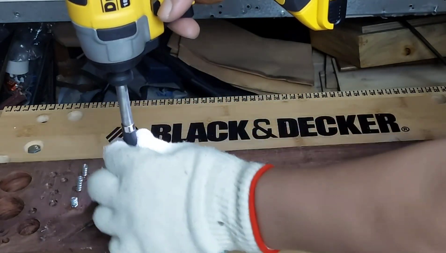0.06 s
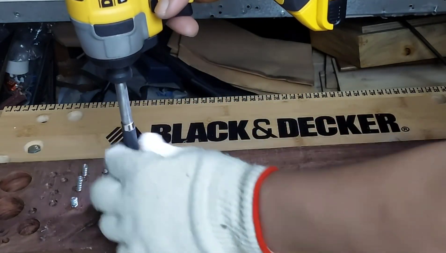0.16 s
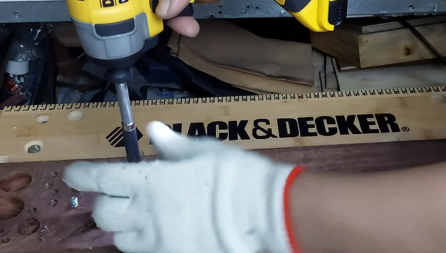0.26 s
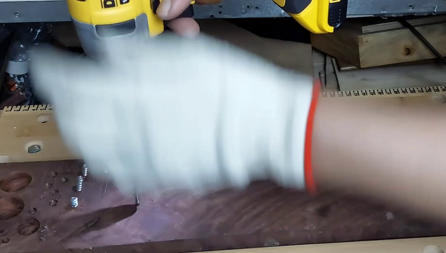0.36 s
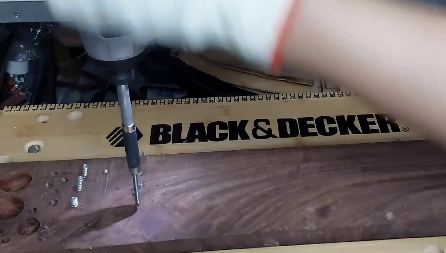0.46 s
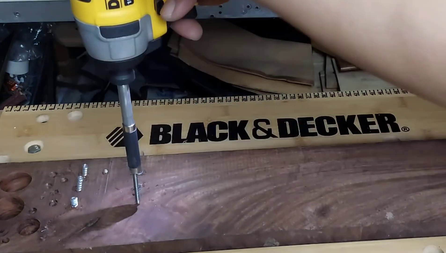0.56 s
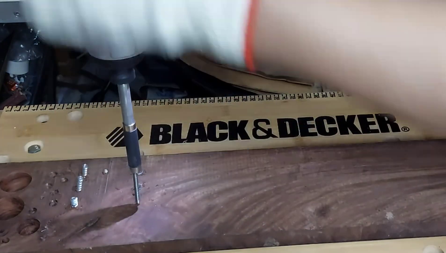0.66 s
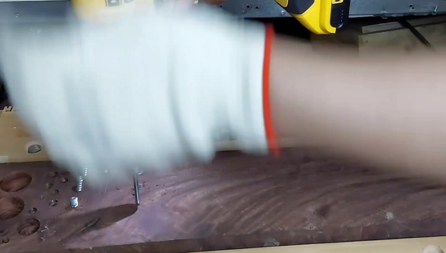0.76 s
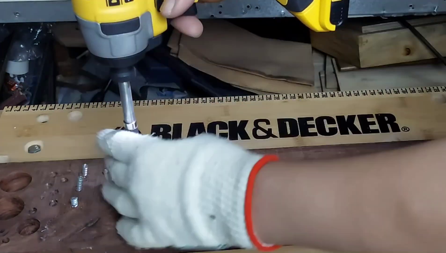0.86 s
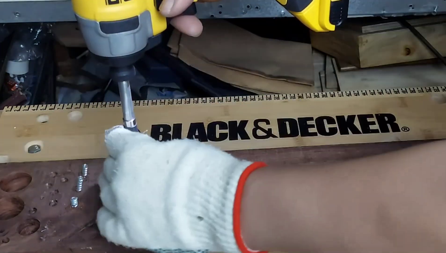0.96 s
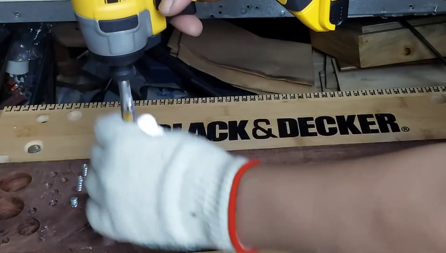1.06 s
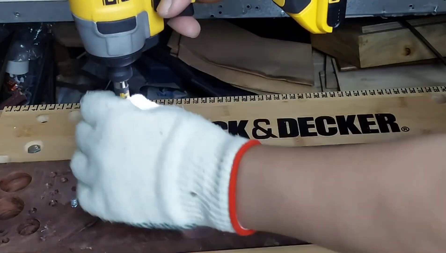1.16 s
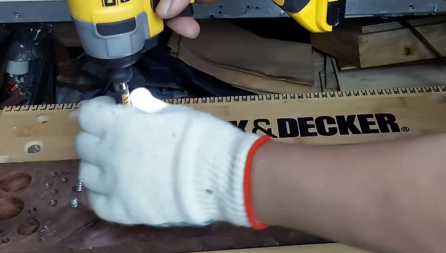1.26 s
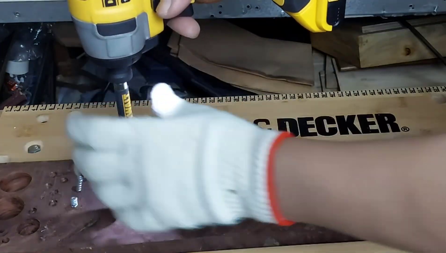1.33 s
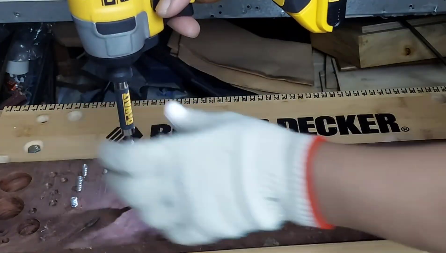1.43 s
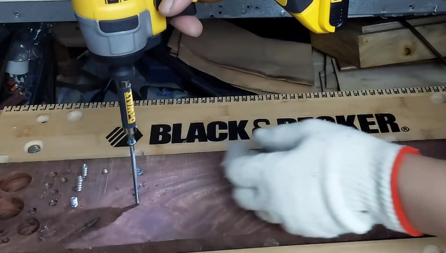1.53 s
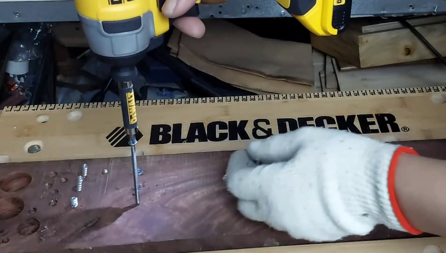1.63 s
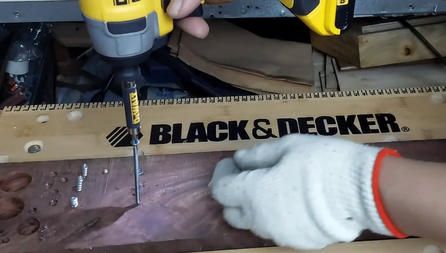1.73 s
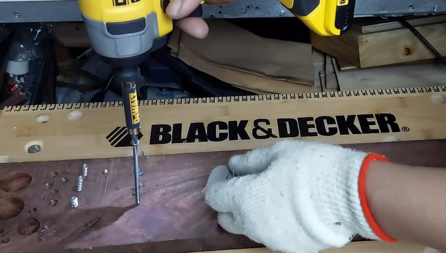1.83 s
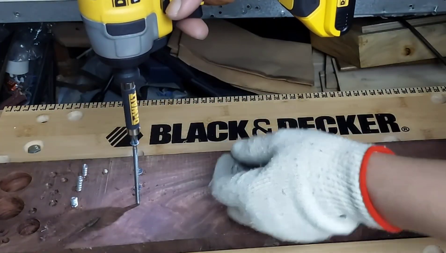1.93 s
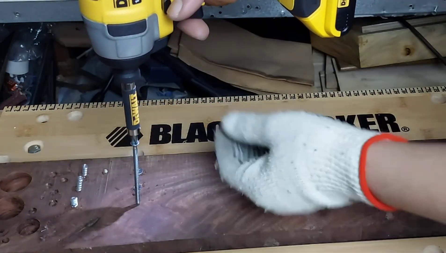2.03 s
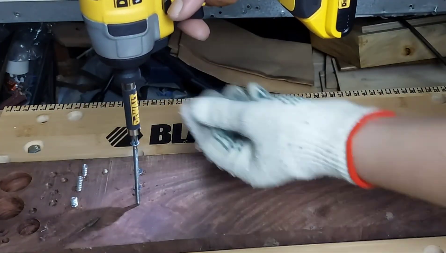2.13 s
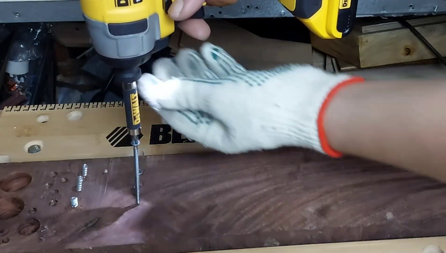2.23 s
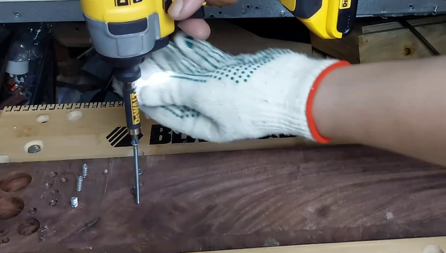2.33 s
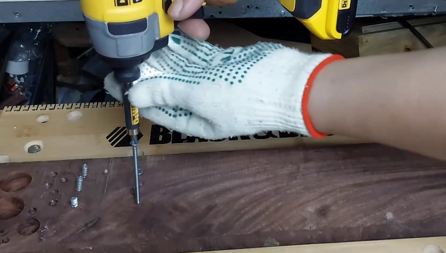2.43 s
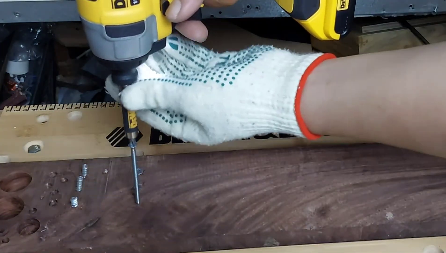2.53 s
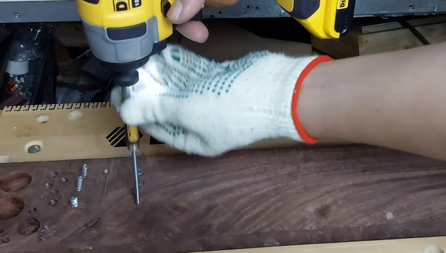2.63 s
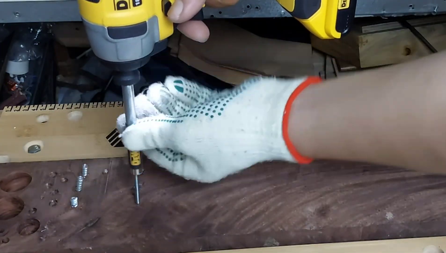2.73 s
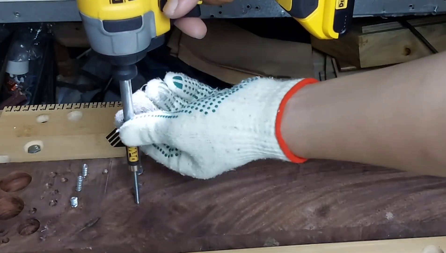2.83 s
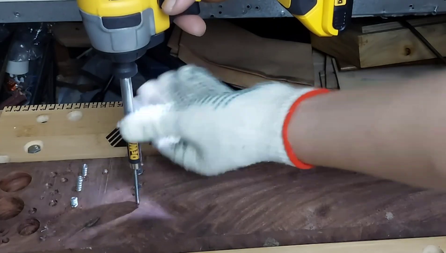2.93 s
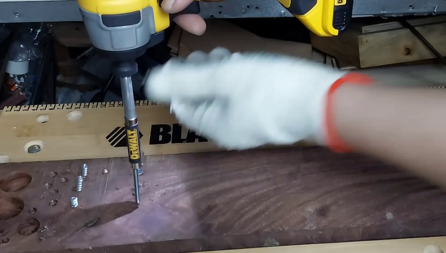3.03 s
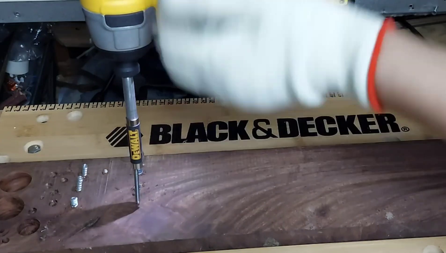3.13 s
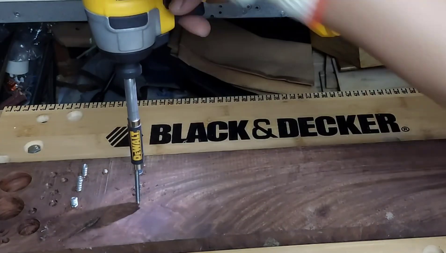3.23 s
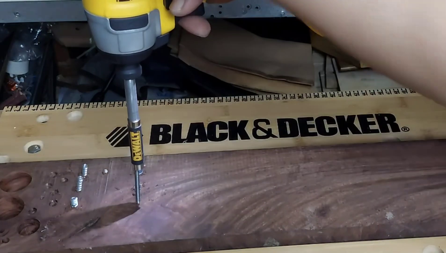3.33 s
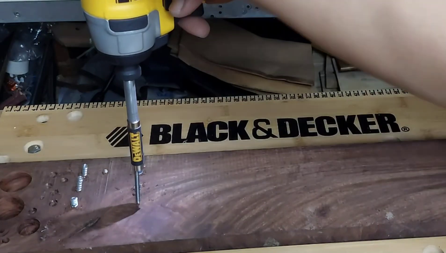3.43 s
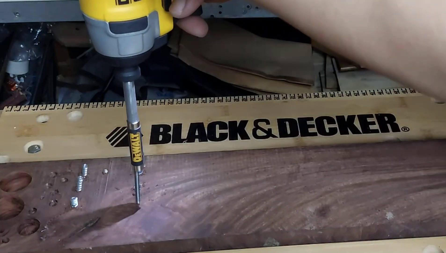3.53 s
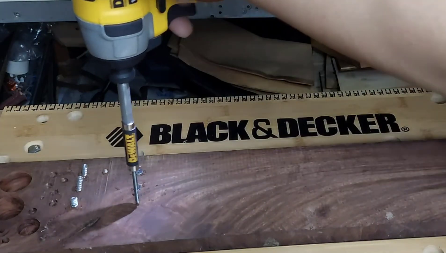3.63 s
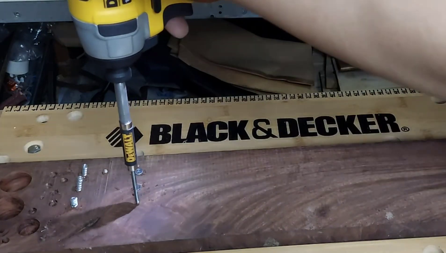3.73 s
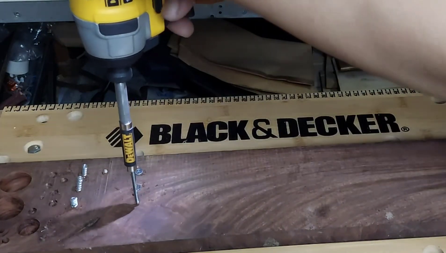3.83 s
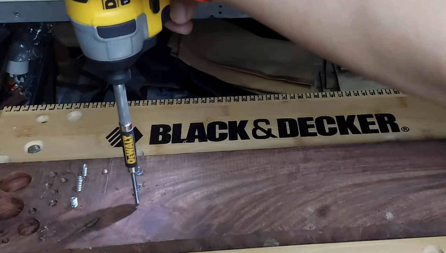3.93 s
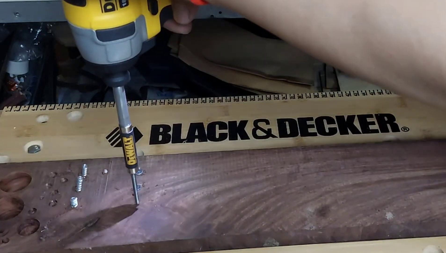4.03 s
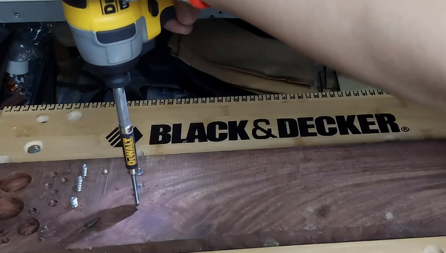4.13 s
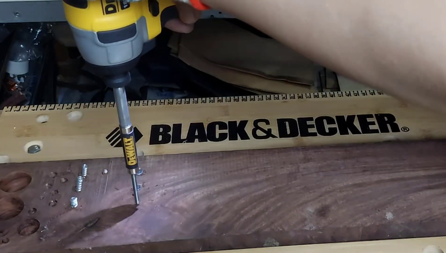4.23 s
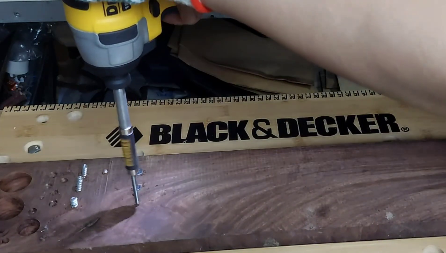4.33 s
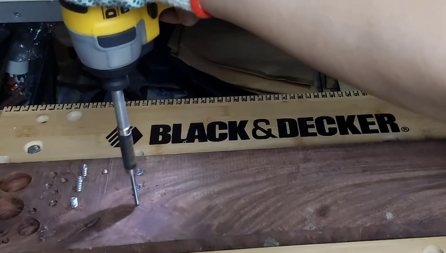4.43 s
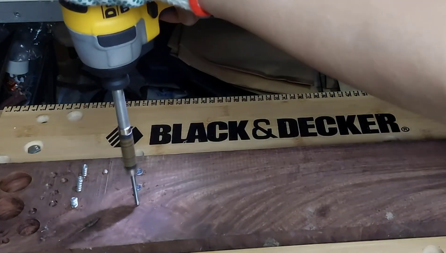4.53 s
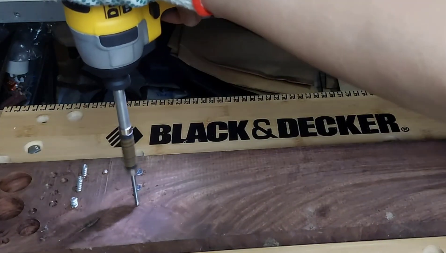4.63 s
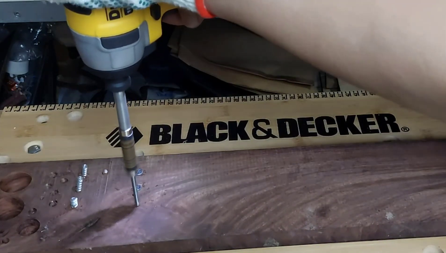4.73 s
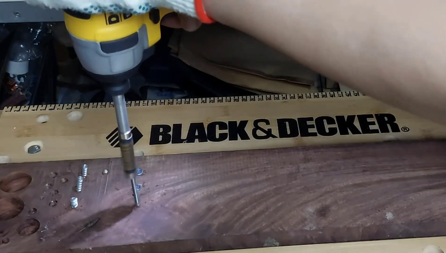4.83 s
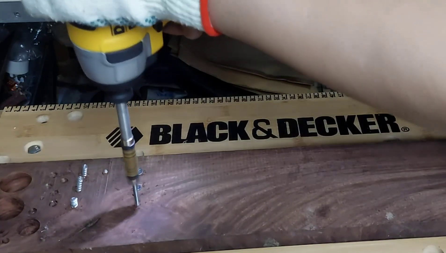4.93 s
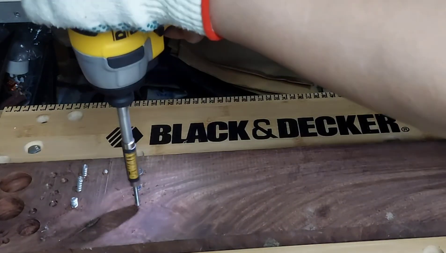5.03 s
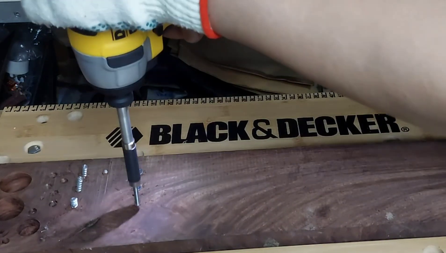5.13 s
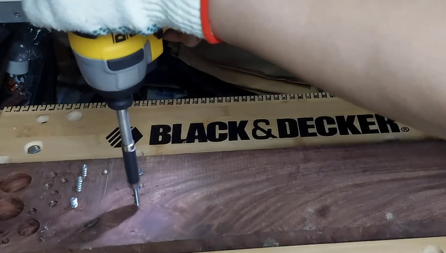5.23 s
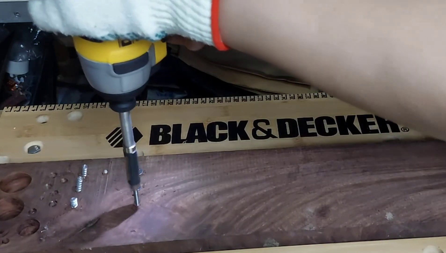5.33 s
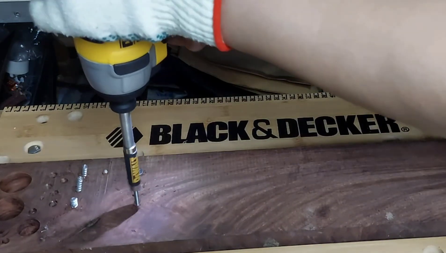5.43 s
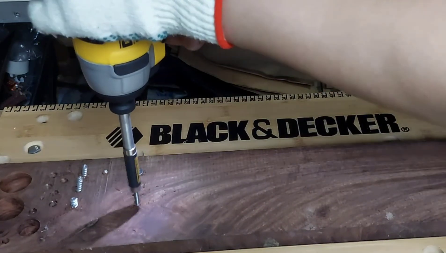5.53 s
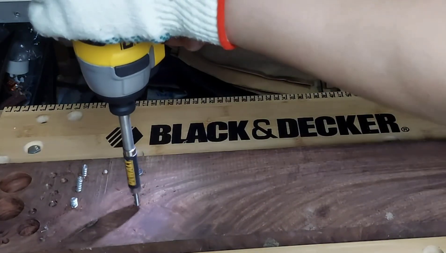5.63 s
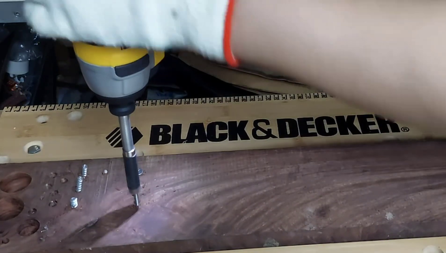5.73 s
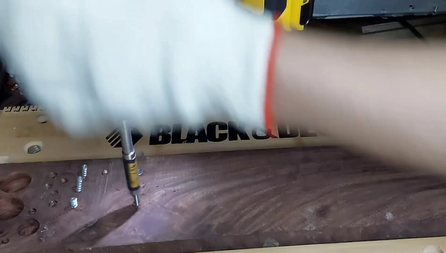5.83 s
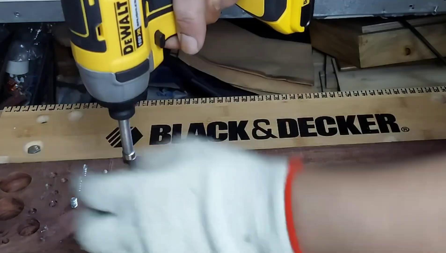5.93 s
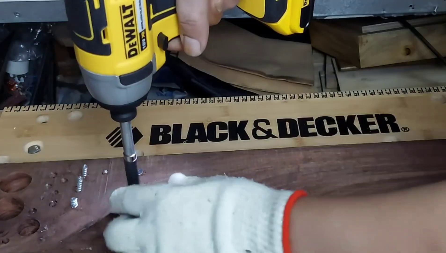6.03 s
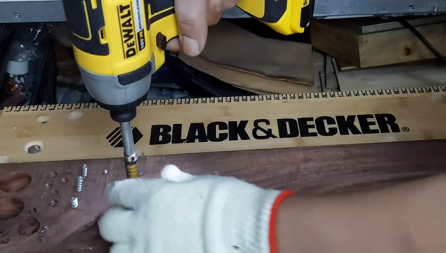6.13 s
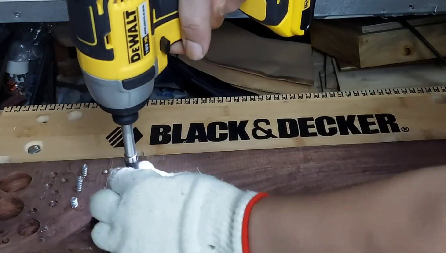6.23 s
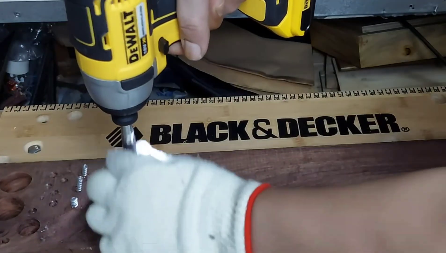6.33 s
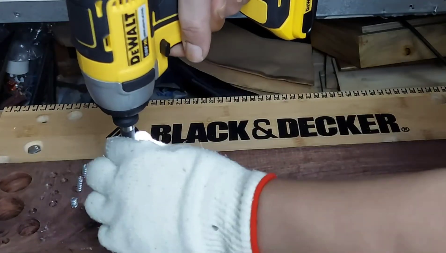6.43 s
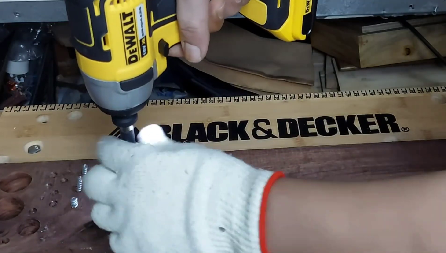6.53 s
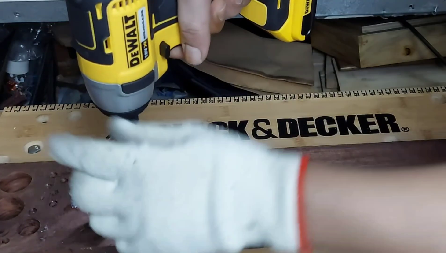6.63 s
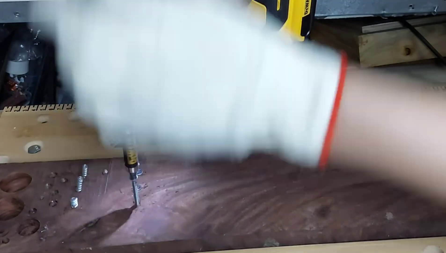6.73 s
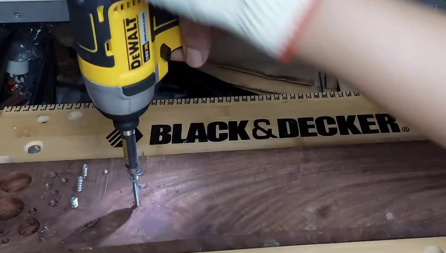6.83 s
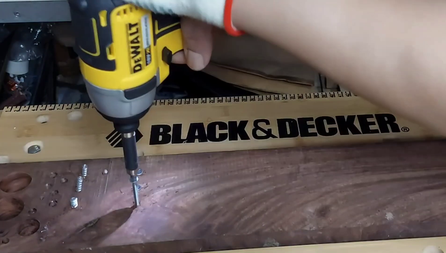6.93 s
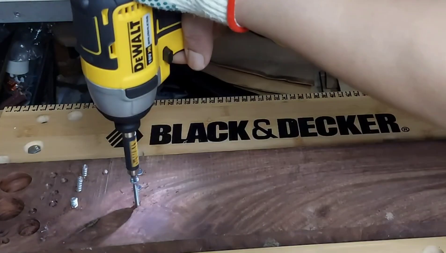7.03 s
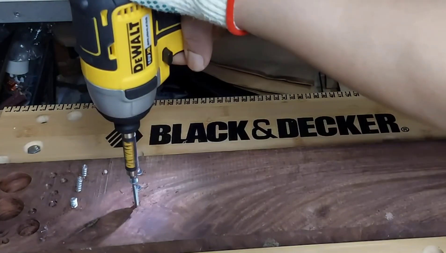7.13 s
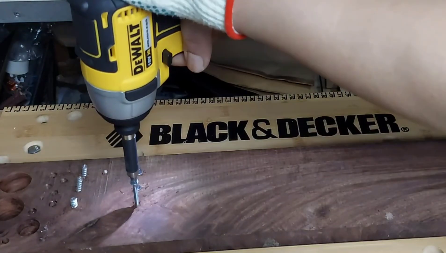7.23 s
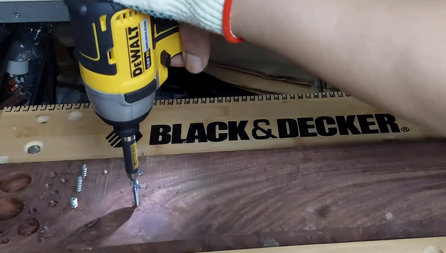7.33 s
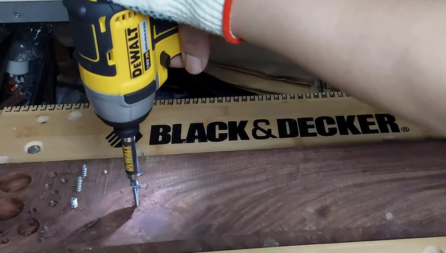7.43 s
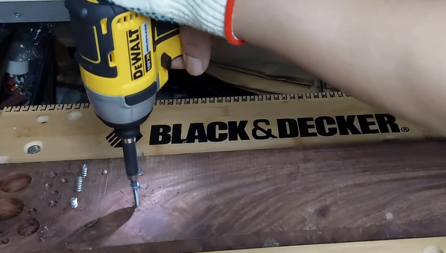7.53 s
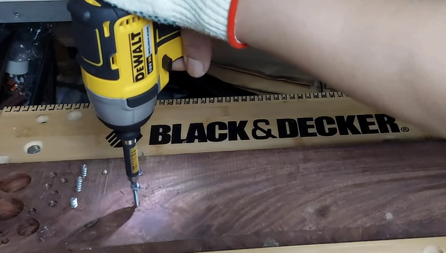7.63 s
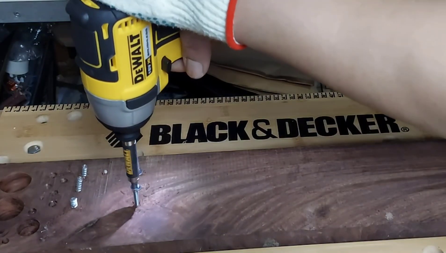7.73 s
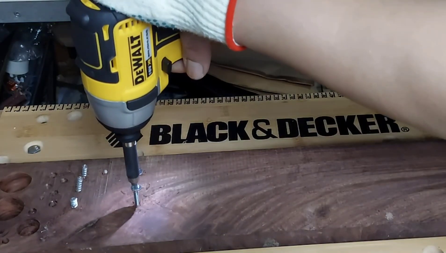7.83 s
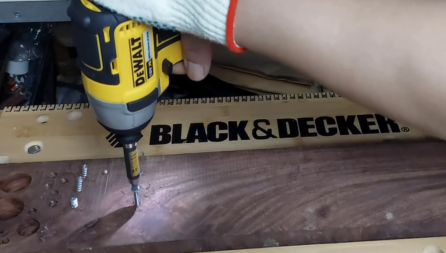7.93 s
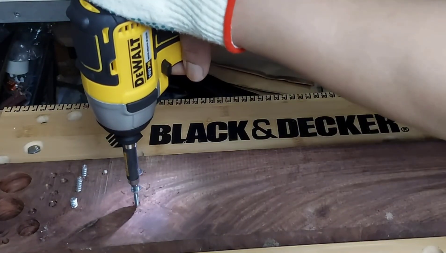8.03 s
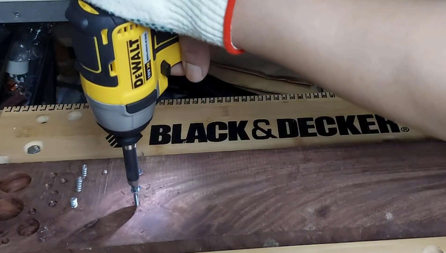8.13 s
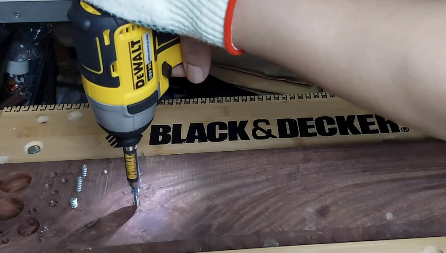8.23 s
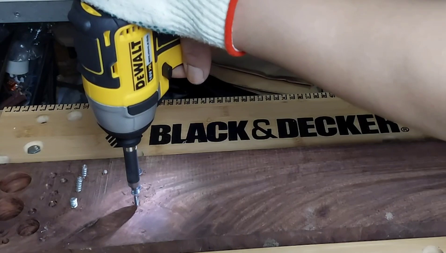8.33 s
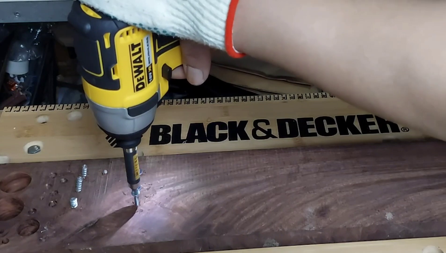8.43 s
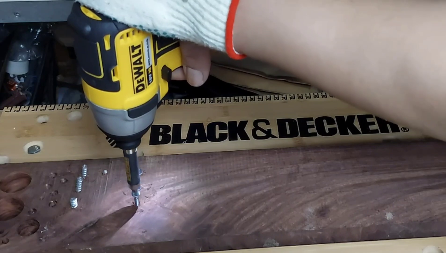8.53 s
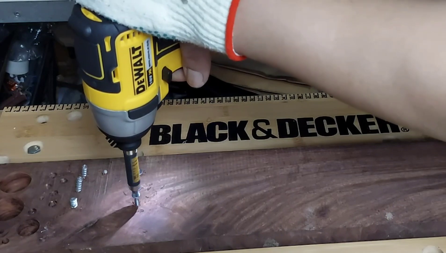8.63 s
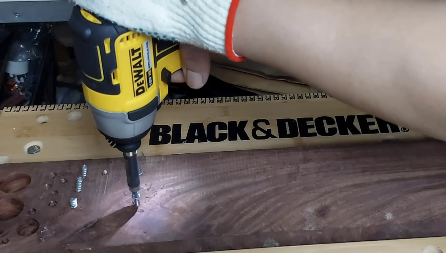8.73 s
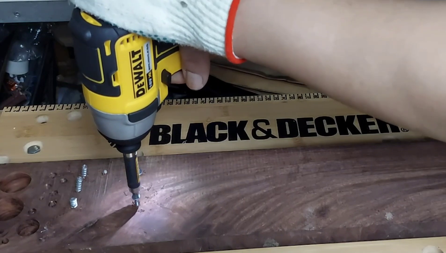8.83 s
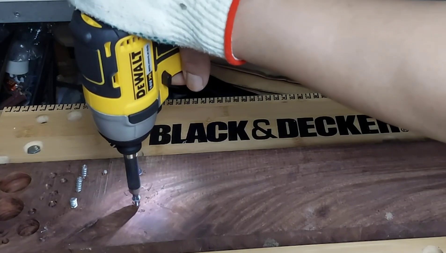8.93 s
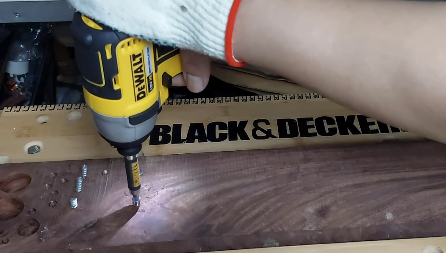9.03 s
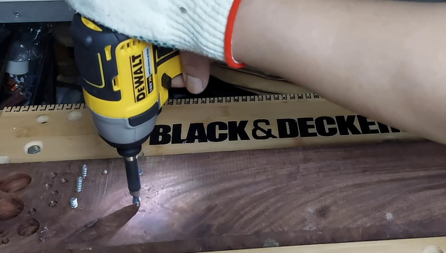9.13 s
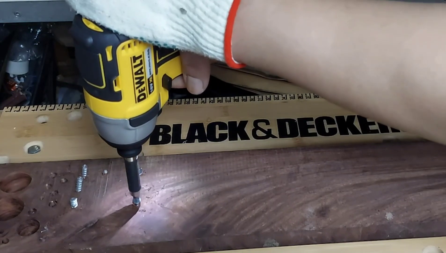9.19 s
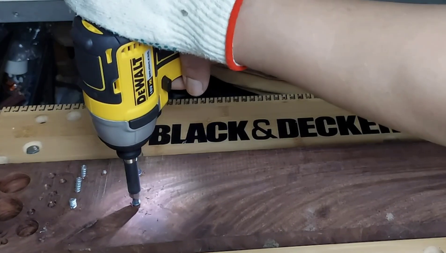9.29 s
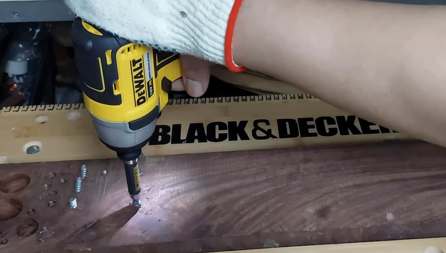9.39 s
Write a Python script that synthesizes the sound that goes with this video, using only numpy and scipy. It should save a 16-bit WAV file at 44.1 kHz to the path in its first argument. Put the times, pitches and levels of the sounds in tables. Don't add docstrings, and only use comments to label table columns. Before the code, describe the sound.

Close to the microphone in a small shed, with low far rumble, faint air and mains hum. At 0.2 s a firm knock of the steel bit sleeve, with soft glove rustle. Around 1.0 s a faint touch, rubbing and thin high squeaks, then a short knock at 1.3 s. Quiet rustling follows; at 2.9 s comes a slower, dull knock with a short steely ring. Light cloth movement and tiny squeaks lead to a sharp trigger click at 4.5 s. The motor whirs up quickly with a high whine, runs freely until about 5.0 s, then sinks steeply in pitch under load. From 5.2 s to the end near 9.5 s, loud, harsh impact hammering at roughly 44 blows a second, nearly even with tiny slips. Each blow cracks and rings; the colour shifts from woody plank to steel shank and bit, growing more resonant from 8.8 s as the screw head seats. Short room echoes surround it.

```python
import sys
import numpy as np
from scipy import signal
from scipy.fft import rfft, irfft, next_fast_len
from scipy.io import wavfile
from scipy.ndimage import uniform_filter1d

SR = 44100
rng = np.random.default_rng(int(sys.argv[2]) if len(sys.argv) > 2 else 0)


def wav_record(signal):
    frames = np.transpose(np.atleast_2d(signal))
    bounded = np.clip(frames, -1, 1)
    quanta = np.round(bounded * 32767).astype(np.int16)
    wavfile.write(sys.argv[1], SR, quanta)


def natural_amplitude(level_db):
    exponent = np.asarray(level_db, float) / 20
    return 10 ** exponent


N = 417186

# (frequency [Hz], density [dB per Hz])
RUMBLE = [(15, -40), (25, -36), (37, 3), (65, 5), (123, -4), (157, -1), (395, -17.5), (424, -12.5),
          (700, -44), (910, -97), (1540, -120)]
# (frequency [Hz], density [dB per Hz])
AIR = [(120, -47), (200, -8.5), (398, -12), (419, -28), (497, -9.5), (580, -15.5), (689, -13),
       (2330, -19.5), (9860, -40), (12100, -40), (15800, -87), (22000, -120)]
# (frequency [Hz], level [dB rms])
MAINS = [(208, -51.5), (515, -61), (406, -63)]
# (start [s], hold [s], level [dB])
GLOVES = [(0.105, 0.12, -42.5), (.8, 0.062, -45), (0.972, 0.079, -50), (1.067, 0.16, -44.5),
          (1.245, 0.11, -48), (1.426, 0.067, -45), (1.548, 0.4, -54.5), (2.715, 0.066, -44),
          (2.82, 0.33, -50), (3.784, 0.065, -49), (4.1, 0.49, -51)]
# (frequency [Hz], density [dB per Hz])
GLOVE_COLOUR = [(500, -7), (1200, 11), (2300, 0), (4000, -3.5), (6000, -9), (8500, -15), (11000, -14),
                (12300, -35)]
# (start [s], hold [s], level [dB], frequency [Hz], width [Hz])
RUBS = [
    (.1, .07, -52, 2100, 250),
    (.955, .08, -49, 1200, 150),
    (1.08, .11, -58, 5000, 2500),
    (2.712, .07, -50, 2300, 700),
]
# (start [s], length [s], from [Hz], to [Hz], level [dB])
SQUEAKS = [(1.045, .04, 10700, 8900, -66), (1.095, .075, 9950, 10550, -67), (1.09, .1, 8600, 9300, -65),
           (1.195, .06, 10100, 10750, -68), (2.72, .05, 10900, 10750, -64), (2.77, .06, 10700, 9950, -66),
           (4.05, .045, 10800, 8500, -61), (4.24, .045, 9950, 9900, -67), (4.405, .02, 9750, 10100, -58),
           (4.422, .045, 10100, 9650, -57), (4.482, 0.05, 9650, 10800, -53)]
# (time [s], peak [dB], spread [s], ringing re peak [dB], dullness [Hz])
KNOCKS = [
    (0.172, -16, 0.00202, -9, 3500),
    (1.035, -37, 0.002, -6.5, 3480),
    (1.287, -19.5, 0.0012, -10.5, 3460),
    (2.897, -14.5, 0.0026, -12.5, 2900),
    (4.519, -10, 0.0014, -24, 3400),
]
# (frequency [Hz], level [dB], t60 [s])
KNOCK_MODES = [
    [(1074, 2, 0.04), (1620, 1, 0.057), (1370, 2, 0.023), (570, -5, 0.027)],
    [(1010, 15, 0.029)],
    [(980, 10.5, 0.045), (607, -3, 0.051)],
    [(1015, -1, 0.22), (1000, -3, 0.15), (2545, -1, 0.21), (4100, 1, .04), (5500, -11, .03),
     (1220, 11, 0.02), (600, 0, 0.025)],
    [(1300, -3, 0.04)],
]
# (time [s], gear mesh [Hz], torque re full load [dB])
MOTOR = [(4.522, 201, -40), (4.555, 395.6, -37), (4.59, 1970, -17), (4.63, 2360, -3), (4.66, 2490, -9),
         (4.74, 2600, -9.5), (4.91, 2565, -10), (4.95, 2545, -6), (5.01, 2485, -1), (5.04, 2137, 4),
         (5.07, 1888, 3.5), (5.12, 1655, 1), (5.18, 1542, 2), (5.25, 1622, -8.5), (6.0, 1611, -8),
         (8.0, 1607, -5.5), (9.46, 1627, -8)]
# (multiple of mesh [1], level [dB])
MESH = [(1, -1), (2, 0), (3, -2), (4, -5), (5, -7), (6, -9)]
# (ratio to mesh [1], level [dB], share of surge gain [1])
FAN = [(0.635, -7, 0.15), (1.269, -5.5, 0.9)]
# (time [s], frequency [Hz], level [dB])
WHINE = [(4.64, 8300, -60), (4.68, 8570, -31), (4.74, 8650, -29), (4.77, 8650, -42), (4.81, 8640, -42),
         (4.83, 8630, -29), (4.92, 8500, -30), (4.98, 8430, -33), (5.01, 8250, -70)]
# (frequency [Hz], density [dB per Hz])
LOOSE_HISS = [(120, -63), (200, -11.5), (229, -31), (277, -18), (404, -16), (441, -22.5), (643, -19.5),
              (1020, -1), (1540, -2), (2580, -18.5), (2910, -0.5), (3900, 1.5), (8170, -16), (8750, -17),
              (12100, -22), (15800, -74), (22000, -120)]
# (frequency [Hz], density [dB per Hz])
LOADED_HISS = [(900, 3), (1800, -9), (3300, -1), (4200, -3.5), (6000, -5), (9000, -8.5), (11500, -14),
               (13000, -33)]
# (frequency [Hz], width [Hz], level [dB])
HOUSING = [(980, 32, -5.5), (1190, 18, -10), (1860, 360, -33.5), (2410, 440, 6)]
# (frequency [Hz], width [Hz], level
# [dB])
MESH_BANDS = [(3290, 220, -6), (4700, 200, -9.5), (6350, 300, -13.5), (7770, 75, -28)]
# (start [s], rate [blows per s], count [blows])
HAMMER = [(5.194, 44, 1), (5.2044, 40.58, 4), (5.31, 42.23, 15), (5.6729, 43.86, 7), (5.8438, 44.01, 8),
          (6.0288, 44.96, 16), (6.3807, 44.96, 12), (6.6555, 44.64, 15), (7.0013, 44.33, 7),
          (7.1737, 42.66, 4), (7.2759, 44.33, 12), (7.5609, 48.08, 2), (7.6173, 44.64, 16),
          (7.9785, 44.96, 8), (8.1655, 44.8, 8), (8.3489, 44.48, 15), (8.7007, 43.86, 4),
          (8.7981, 42.81, 7), (8.965, 43.1, 19), (9.4157, 46.47, 3)]
# (frequency [Hz], level [dB], t60 [s])
PLANK = [(970, 8, 0.053), (1044.6, 4, 0.089), (1150, -2, 0.025)]
# (frequency [Hz], level [dB], t60 [s])
BENCH = [(607.7, -1, 0.071), (540, 4, 0.02), (453, -18, 0.14), (665, -13, 0.024)]
# (frequency [Hz], level [dB], t60 [s])
SHANK = [(1209.3, 8, 0.035), (1095, -5, 0.022), (1358, -7, 0.032)]
# (frequency [Hz], level [dB], t60 [s])
BIT = [(1430.6, 5, 0.071), (1540, -1, 0.026), (1354, 0, 0.094)]
# (frequency [Hz], level [dB], t60 [s])
HEAD = [(953, 9.5, 0.053), (855, -0.5, 0.049), (787, -8.5, 0.024)]
# (frequency [Hz], level [dB], t60 [s])
ANVIL = [(313.8, -5.5, 0.043), (332, -7, 0.056), (151.7, -11, 0.028), (1946, 0, 0.0082), (2546, 3.5, 0.02),
         (2740, -9, 0.011)]
# (ringing [dB], gain in its turn [dB], from [s], to [s], gain as the head seats [dB])
TURNS = [
    (-30.5, 6, 5.1, 6.0, 2),
    (-38, 7, 6.3, 8.9, 10),
    (-30, 7, 6.05, 7.1, 0.5),
    (-30.5, 7, 7.1, 8.75, 6),
    (-36, 6, 7.1, 9.1, 8),
    (-30, 4.5, 8.1, 9.6, -2.5),
]
# (frequency [Hz], density [dB per Hz])
CRACK = [(700, 4.5), (1500, 3.5), (2500, -7.5), (3300, -4), (4500, -2.5), (7000, -12), (10000, -19.5),
         (12300, -7)]

RUMBLE_DB, AIR_DB, SHAKE_DB = -45.5, -47.5, -43.5
DUCK_DB, STALL_DUCK_DB = -3.5, -21
GRIP_S, LET_GO_S = 0.052, 0.07
FOLD_HZ, FOLD_DB = 11025, -3
SHED_T60_S, SHED_DB, KNOCK_SHED_DB = 0.49, -11, -10
RATTLE_DB, RATTLE_FADE_S = -18.5, 0.084
MESH_DB, SLACK_DB = -5, -14
FAN_DB, FAN_SURGE_DB = -26, 20
SURGE_HZ_PER_S = 3700
HISS_DB, ENGAGE_S, ENGAGE_RISE_S = -14, 4.553, 0.0079
CREEP_DB, SLOWING_DB = -9, -2
LURCH_DB, LURCH_FADE_S = 9.5, 0.037
STALL_DB, HAMMERING_DB = 1, 1.5
RACE, RACE_PEAK, RACE_LOW = 0.0464, 0.22, 0.937
HANDOVER_S, SEATING_S, SEATING_RISE_S = 0.026, 8.8, 0.12
FIRST_THUMP_DB = 18
TOP = 0.88


def rms_one(x):
    return x / np.sqrt(np.mean(x ** 2) + 1e-20)


def in_time(rows, before=None):
    s, *columns = np.transpose(rows)
    return [np.interp(np.arange(N) / SR, s, c, left=before) for c in columns]


def between(start_s, end_s, rise_s, fall_s):
    t = np.arange(N) / SR
    return (1 + np.tanh((t - start_s) / rise_s)) * (1 + np.tanh((end_s - t) / fall_s)) / 4


def drift(rate):
    sos = signal.butter(2, rate, fs=SR / 20, output="sos")
    slow = signal.sosfilt(sos, rng.standard_normal(N // 20 + 4002))[4000:]
    return np.interp(np.arange(N) / 20, np.arange(len(slow)), rms_one(slow))


def coloured(spectrum):
    size = next_fast_len(N)
    hz = np.maximum(np.arange(size // 2 + 1) * SR / size, 1)
    at, level_db = np.transpose(spectrum)
    shape = natural_amplitude(np.interp(np.log(hz), np.log(at), level_db, left=-90, right=-90))
    return rms_one(irfft(rfft(rng.standard_normal(size)) * shape, size)[:N])


def high_pass(x, hz):
    return signal.sosfilt(signal.butter(2, hz, "high", fs=SR, output="sos"), x)


def ring(clicks, hz, t60):
    r, w = natural_amplitude(-60 / (t60 * SR)), 2 * np.pi * hz / SR
    return signal.lfilter([0, np.sin(w)], [1, -2 * r * np.cos(w), r * r], clicks + 1e-18)


def fade(clicks, tau_s):
    return signal.lfilter([1], [1, -np.exp(-1 / (tau_s * SR))], np.abs(clicks) + 1e-18)


def blows():
    return np.concatenate([s + np.arange(count) / per_s for s, per_s, count in HAMMER]) - 0.0025


def shed(x):
    t = np.arange(round(0.6 * SR)) / SR
    white = rng.standard_normal(len(t)) * (t > 0.004)
    dull = signal.lfilter([0.3], [1, -0.7], white)
    tail = dull * natural_amplitude(-60 * t / SHED_T60_S) + 0.7 * (white - dull) * natural_amplitude(-70 * t / SHED_T60_S)
    return signal.fftconvolve(x, tail / np.linalg.norm(tail))[:N]


def squeaks():
    out = np.zeros(N)
    for s, length, from_hz, to_hz, db in SQUEAKS:
        t = np.arange(round(length * SR)) / SR
        turns = (from_hz + (to_hz - from_hz) * t / length / 2) * t
        whistle = np.sin(2 * np.pi * turns)
        mirror = np.sin(2 * np.pi * (2 * FOLD_HZ * t - turns))
        both = whistle + natural_amplitude(FOLD_DB) * mirror
        out[round(s * SR):][:len(t)] += natural_amplitude(db) * signal.windows.tukey(len(t), 0.5) * both
    return out


def gloves():
    touch = sum(natural_amplitude(db) * between(s, s + hold, GRIP_S, LET_GO_S) for s, hold, db in GLOVES)
    rustle = touch * natural_amplitude(1.1 * drift(40)) * coloured(GLOVE_COLOUR)
    skin, rub = rng.standard_normal(N), np.zeros(N)
    for s, hold, db, hz, width in RUBS:
        stroke = between(s, s + hold, 0.01, 0.017)
        rub += natural_amplitude(db) * stroke * rms_one(ring(skin, hz, 3.2 / width))
    return rustle + rub + squeaks()


def surroundings():
    first = blows()[0]
    duck_db = DUCK_DB * between(5.06, 99, 0.078, 1) + STALL_DUCK_DB * between(5.04, first, 0.03, 0.005)
    t = np.arange(N) / SR
    hum = sum(natural_amplitude(db + 1.5 + 1.2 * drift(26)) * np.sin(2 * np.pi * hz * t) for hz, db in MAINS)
    rumble = natural_amplitude(RUMBLE_DB + duck_db + 3.0 + 0.56 * drift(13.0)) * coloured(RUMBLE)
    air = natural_amplitude(AIR_DB + duck_db) + natural_amplitude(SHAKE_DB) * between(first, 99, 0.041, 1)
    return hum + rumble + air * coloured(AIR)


def knocks():
    out, white = np.zeros(N), rng.standard_normal(N)
    for (s, peak_db, spread_s, ring_db, dull_hz), modes in zip(KNOCKS, KNOCK_MODES):
        x = np.clip((np.arange(N) / SR - s) / spread_s, 0, 600)
        swell = (x / 2) ** 2 * np.exp(2 - x)
        rattle = natural_amplitude(RATTLE_DB) * np.tanh(x / 2) * np.exp(-x * spread_s / RATTLE_FADE_S)
        chatter = natural_amplitude(peak_db) * white * (swell + rattle)
        band = signal.butter(1, [650, min(dull_hz, 15000)], "band", fs=SR, output="sos")
        out += signal.sosfilt(band, chatter)
        click = np.zeros(N)
        click[round((s + 2 * spread_s) * SR)] = natural_amplitude(peak_db + ring_db)
        out += sum(natural_amplitude(db) * ring(click, hz, t60) for hz, db, t60 in modes)
    return out


def gear_hiss(taut, hammering):
    creep = between(0, ENGAGE_S + ENGAGE_RISE_S / 2, 1e-3, ENGAGE_RISE_S / 2)
    lurch = between(ENGAGE_S, ENGAGE_S + LURCH_FADE_S, 0.01, LURCH_FADE_S)
    level_db = HISS_DB + SLOWING_DB * between(9.1, 99, 0.86, 1) + CREEP_DB * creep + LURCH_DB * lurch
    level_db = level_db + taut * np.where(hammering, HAMMERING_DB, STALL_DB)
    loose = coloured(LOOSE_HISS) * natural_amplitude(2.0 * drift(67))
    boxy = sum(natural_amplitude(db) * rms_one(ring(loose, hz, 2.2 / width)) for hz, width, db in HOUSING)
    boxy_gain = natural_amplitude(-9.0 - 4.76 * hammering)
    bright = coloured(LOADED_HISS) * natural_amplitude(2.0 * drift(86))
    banded = np.zeros(N)
    for hz, width, db in MESH_BANDS:
        banded += natural_amplitude(db) * rms_one(ring(loose, hz, np.log(1000) / (np.pi * width)))
    hiss = (1 - taut) * loose + taut * (natural_amplitude(-5.0) * bright + hammering * banded)
    return natural_amplitude(level_db - 1.5) * (hiss + boxy_gain * boxy)


def motor():
    mesh_hz, torque_db = in_time(MOTOR)
    whine_hz, whine_db = in_time(WHINE)
    t, times = np.arange(N) / SR, blows()
    struck = np.interp(t, times, np.arange(len(times)))
    hammering = struck > 0
    on = np.arange(N) >= MOTOR[0][0] * SR
    taut = np.clip((t - 5.0) / 0.02, 0, 1)

    swing = hammering * np.interp(struck, [RACE_PEAK, RACE_LOW], [1, -1], period=1)
    speed = 1 + RACE * swing * (1 + 0.15 * drift(15.75)) + 0.00295 * drift(54.8)
    turns = np.cumsum(mesh_hz * speed) / SR
    wobble = 1 + np.where(hammering, 0.3, 0.7) * np.cos(2 * np.pi * turns / 13.0)
    mesh = np.zeros(N)
    for k, db in MESH:
        muffle_db = -5.5 * (k * mesh_hz / 6000) ** 2 + 4 * np.tanh(drift(60))
        slack_db = SLACK_DB * (k > 1) * (1 - taut)
        mesh += natural_amplitude(db + muffle_db + slack_db) * np.sin(2 * np.pi * k * turns)

    surge = np.tanh(uniform_filter1d(np.abs(np.gradient(mesh_hz)) * SR, size=900) / SURGE_HZ_PER_S)
    surge = surge + taut * (0.55 - surge)
    fan_db = FAN_DB + 30 * np.log10(np.minimum(mesh_hz / 2200, 1)) * (1 - taut) - 40 * hammering
    fan = np.zeros(N)
    for k, db, share in FAN:
        fan += natural_amplitude(db + share * FAN_SURGE_DB * surge + 2.0 * drift(32)) * np.sin(2 * np.pi * k * turns)

    whine = natural_amplitude(whine_db + drift(30)) * np.sin(2 * np.pi * np.cumsum(whine_hz) / SR)
    tones = natural_amplitude(MESH_DB + torque_db - 8.0) * wobble * mesh + natural_amplitude(fan_db) * fan + whine
    return on * (tones + gear_hiss(taut, hammering))


def hammer():
    times = blows()
    seated = between(SEATING_S, 99, SEATING_RISE_S, 1)
    levels_db = [db + turn_db * between(s, end, HANDOVER_S, HANDOVER_S) + seat_db * seated
                 for db, turn_db, s, end, seat_db in TURNS]
    jolt_db = FIRST_THUMP_DB * between(0, times[0] + 0.02, 1e-3, 0.02)
    levels_db[1] = levels_db[1] + jolt_db
    levels_db[5] = levels_db[5] + 0.5 * jolt_db

    luck = rng.standard_normal((200, 50))[:len(times)]
    at = ((times + 0.00012 * luck[:, 0]) * SR).astype(int)
    second = np.minimum(at + round(0.00246 * SR), N - 1)
    rebound = np.minimum(at + ((0.0105 + 0.00042 * luck[:, 1]) * SR).astype(int), N - 1)
    ringing, column = np.zeros(N), 26
    for modes, level_db in zip((PLANK, BENCH, SHANK, BIT, HEAD, ANVIL), levels_db):
        for hz, db, t60 in modes:
            clicks = np.zeros(N)
            clicks[at] = natural_amplitude(db - 7 + 1.3 * luck[:, 2] + luck[:, column])
            in_step = round(round(0.0025 * hz) / hz * SR)
            clicks[np.minimum(at + in_step, N - 1)] += clicks[at] * natural_amplitude(3 + luck[:, 21])
            clicks[rebound] = clicks[at] * natural_amplitude(-12 + 3 * luck[:, 3])
            ringing += (-1) ** column * natural_amplitude(level_db + 10.5) * ring(clicks, hz, t60)
            column += 1

    clicks = np.zeros(N)
    clicks[at] = natural_amplitude(-9.0 + 2 * luck[:, 2] + 2 * luck[:, 24])
    clicks[second] = natural_amplitude(-9 + 2 * luck[:, 2] + 2.0 * luck[:, 22])
    clicks[rebound] = natural_amplitude(-20 + 3 * luck[:, 23])
    crack = fade(clicks, 0.003) * coloured(CRACK)
    return high_pass(ringing, 130) + high_pass(crack, 1500)


def scene():
    background = surroundings() + gloves()
    knock = knocks()
    tool = motor() + hammer()
    echoes = shed(natural_amplitude(SHED_DB) * tool + natural_amplitude(KNOCK_SHED_DB) * knock)
    return (tool + knock + echoes + background)[None]


def low_pass(x):
    return signal.sosfilt(signal.butter(12, 12270, fs=SR, output="sos"), x)


def record(dry):
    rounded = TOP * np.tanh(dry / TOP / 1.055)
    mix = signal.sosfilt(signal.cheby2(8, 45, 12400, fs=SR, output="sos"), rounded)
    return low_pass(mix)


dry = scene()
out = record(dry)
wav_record(out)
```